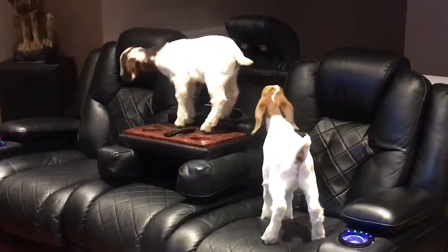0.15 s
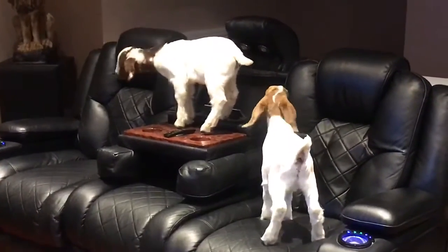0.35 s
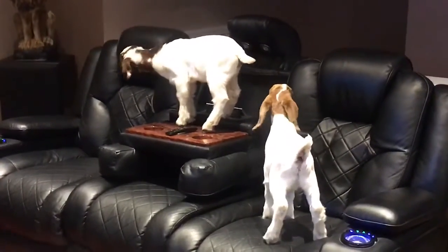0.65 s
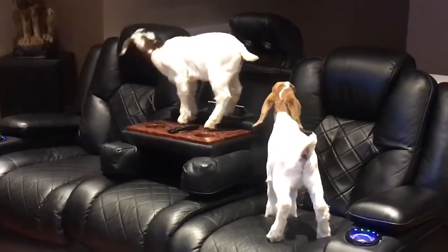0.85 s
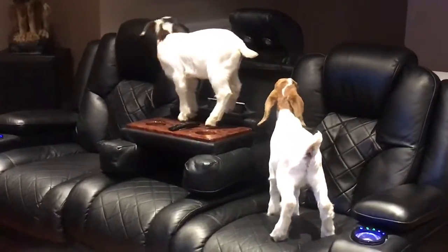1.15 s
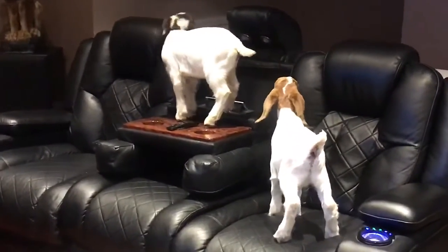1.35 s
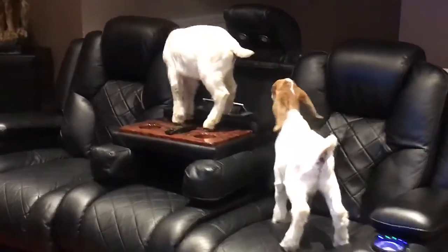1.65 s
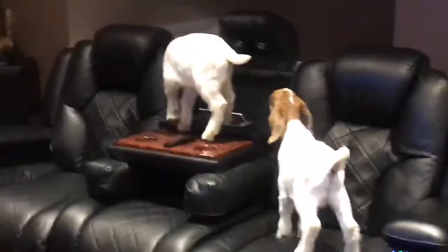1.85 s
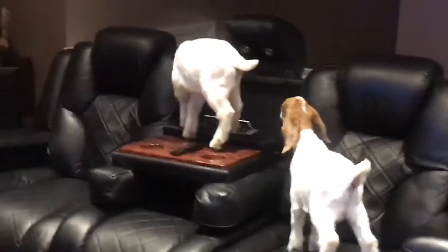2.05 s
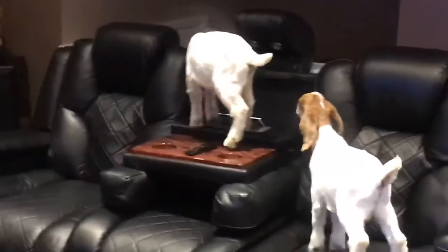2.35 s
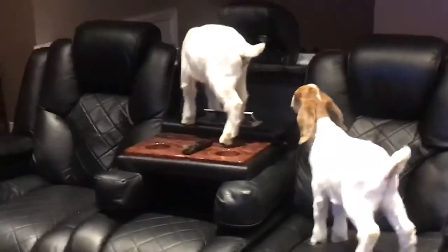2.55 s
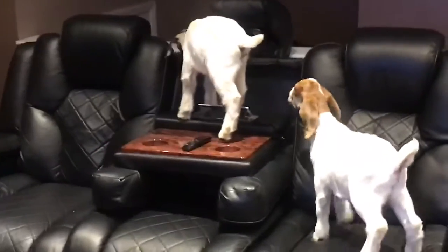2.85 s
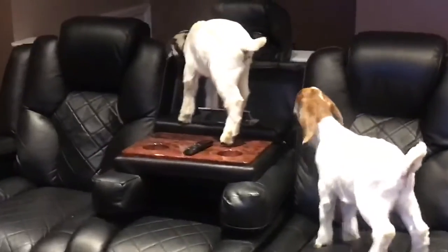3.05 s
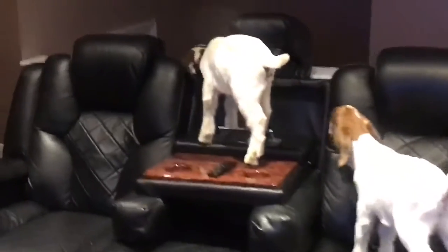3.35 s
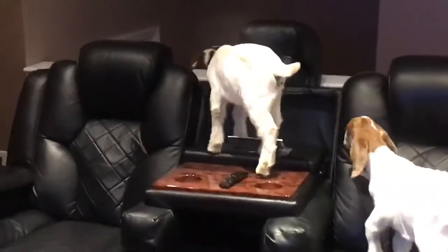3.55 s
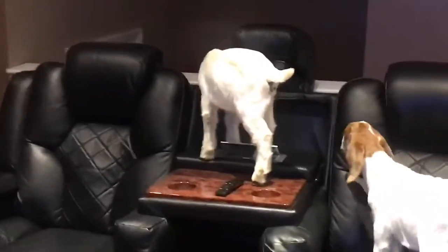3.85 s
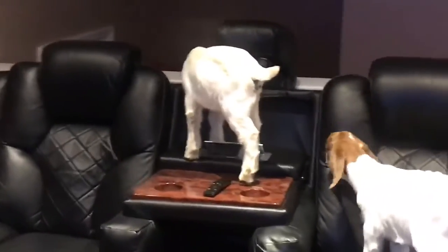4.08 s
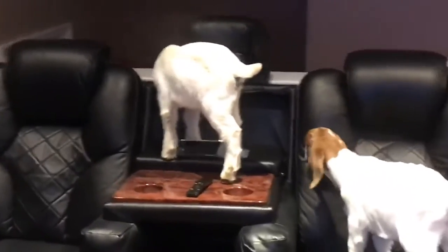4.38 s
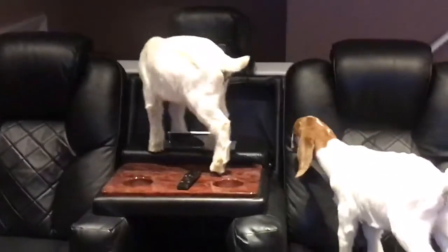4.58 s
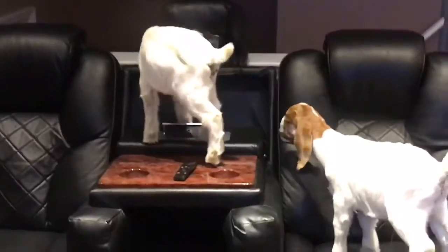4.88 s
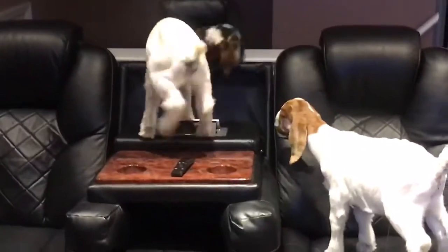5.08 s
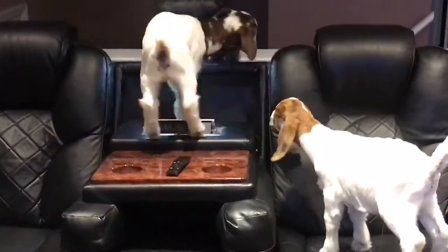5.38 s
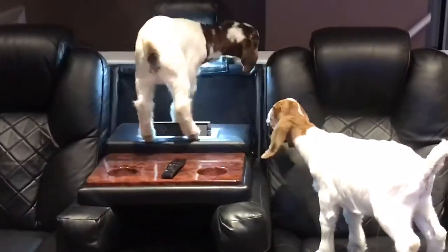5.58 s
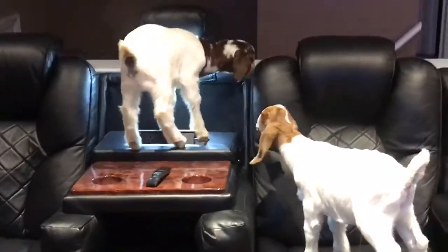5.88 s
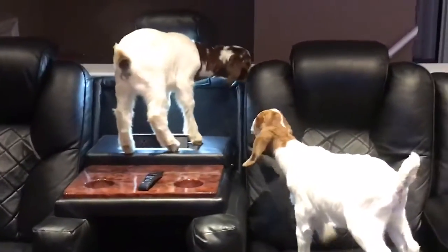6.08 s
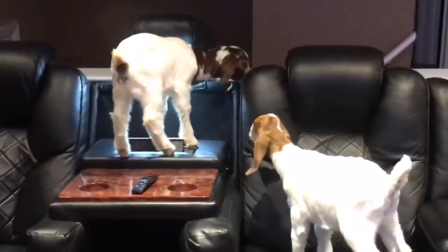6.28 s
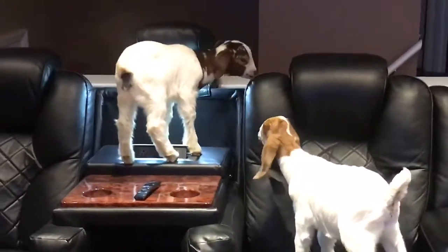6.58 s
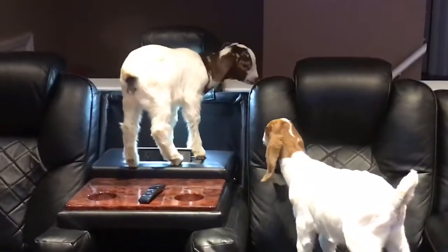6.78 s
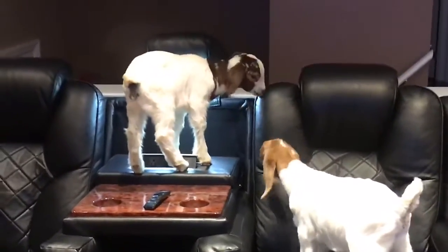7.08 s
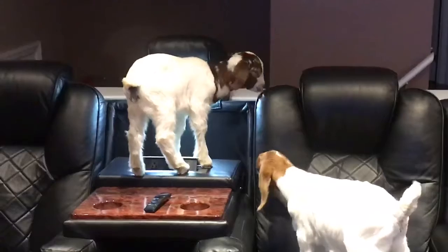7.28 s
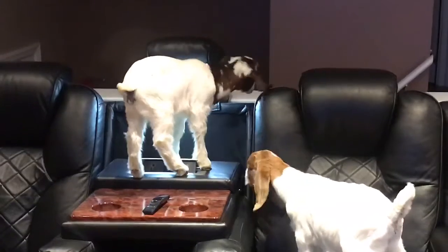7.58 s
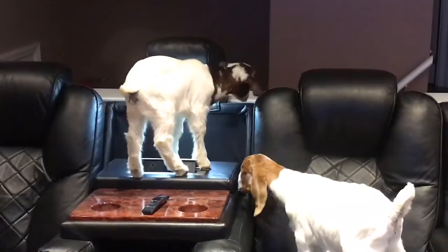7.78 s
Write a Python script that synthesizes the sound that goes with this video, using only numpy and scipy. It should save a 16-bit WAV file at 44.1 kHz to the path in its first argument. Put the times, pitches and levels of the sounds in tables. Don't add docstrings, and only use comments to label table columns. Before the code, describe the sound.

Close, dry hooves of two kid goats thud softly on leather cushions and click on a varnished wooden tray, rattling its loose lid and cup rims. The knocks grow heavy and crowded in the middle, then one kid facing away bleats long and quavering, blurred by the furnished room. Sparser steps and leather rustle follow, with faint microphone hiss.

```python
import sys
import numpy as np
from scipy import signal
from scipy.io import wavfile
from scipy.ndimage import uniform_filter1d

SR = 44100
rng = np.random.default_rng(int(sys.argv[2]) if len(sys.argv) > 2 else 0)


def boost_factor(decibels):
    exponent = np.asarray(decibels, float) / 20
    return 10 ** exponent


def to_wav(s):
    ch = np.atleast_2d(s).T
    pcm = np.round(np.clip(ch, -1, 1) * 32767)
    wavfile.write(sys.argv[1], SR, pcm.astype(np.int16))


N = 349713


def evened(x):
    return x / np.sqrt(np.mean(x ** 2) + 1e-20)


def peaked(x):
    return x / abs(x).max()


def read(points, hz):
    f, value = np.transpose(points)
    return np.interp(np.log(hz + 1), np.log(f + 1), value)


def add(mix, start_s, sound):
    part = mix[round(start_s * SR):][:len(sound)]
    part += sound[:len(part)]


def band(x, low_hz, high_hz):
    edges = [low_hz, min(high_hz, SR / 2.2)]
    return peaked(signal.sosfilt(signal.butter(3, edges, "bandpass", fs=SR, output="sos"), x))


def blunt(t, t60_s, rise_s):
    return boost_factor(-60 * t / t60_s) * (t / (t + rise_s)) ** 3


def wander(count, first, second):
    return evened(uniform_filter1d(uniform_filter1d(rng.standard_normal(count), size=first), size=second))


def noise(shape, patchy_db, flicker_db, size=512):
    frames, hz = N * 4 // size + 5, np.fft.rfftfreq(size, 1 / SR)
    a, b, patches = rng.standard_normal((frames, len(hz), 3)).T
    patches = evened(uniform_filter1d(uniform_filter1d(patches, size=8, axis=0), size=12, axis=1))
    flicker = evened(uniform_filter1d(np.minimum(rng.exponential(1, frames), np.e) - 1, size=2))
    level_db = read(shape, hz)[:, None] + patchy_db * patches + flicker_db * flicker
    z = (a + 1j * b) * boost_factor(level_db)
    return evened(signal.istft(z, nperseg=size, noverlap=size * 3 // 4)[1][:N])


# start_s, peak_db, body_hz, frame_boom_db, hard_edge_db
STAMPS = [(0.448, -33, 202, -37, -37), (0.658, -30, 297, -66, -39.5), (0.978, -38, 200, -36, -40),
          (1.166, -26, 167, -37, -32), (1.825, -38, 187, -35, -50), (1.964, -23, 350, -30, -35),
          (3.011, -25.5, 129, -32.5, -43), (3.072, -25.5, 345, -35.5, -24.5), (3.245, -40, 300, -47, -40),
          (3.386, -10.5, 382, -37.5, -20.5), (3.398, -23, 352, -32, -42), (3.422, -21.5, 350, -51, -39.5),
          (3.765, -19, 197, -32, -41.5), (3.824, -21.5, 187, -40, -40), (3.871, -21, 198, -41, -39.5),
          (4.031, -18, 166, -28, -30), (4.063, -20.5, 240, -31, -43), (4.473, -22.5, 188, -38.5, -31.5),
          (4.625, -19.5, 200, -36, -39), (4.666, -22, 171, -35, -43), (4.793, -26, 148, -59, -39.5),
          (5.466, -24, 176.7, -31, -46), (6.598, -30, 376, -35, -36), (6.821, -37, 306, -55, -44)]
# start_s, peak_db, body_hz, hard_edge_db
LIGHT_STEPS = [(0.611, -45, 136, -51.5), (1.308, -37, 183, -49.5), (1.531, -33.5, 176, -46.5),
               (1.61, -41, 135, -50), (2.613, -36, 132, -45), (2.987, -29, 186, -48),
               (3.029, -33, 120, -55), (3.157, -34, 187, -48), (3.328, -38, 177, -64),
               (3.362, -34, 200, -52), (3.936, -32.5, 160, -57), (3.976, -35, 167, -55),
               (4.45, -36, 143, -55), (5.117, -34.5, 165, -70), (5.813, -27, 132, -42),
               (5.93, -37, 135.7, -54), (6.252, -31, 137, -49), (6.273, -36, 132, -46.5),
               (6.289, -34, 155, -47.5), (6.627, -31, 134, -45), (6.772, -40.5, 158, -53),
               (6.886, -40.5, 151, -68), (7.283, -44.5, 153.6, -74), (7.453, -43, 130, -77),
               (7.54, -39, 100, -70), (7.69, -42.5, 100, -70.5), (7.1, -45, 119, -71),
               (3.44, -34, 140, -60),
               (2.389, -33.5, 216, -55), (2.413, -34, 345, -53), (2.438, -41, 353, -54),
              (2.635, -29.5, 227, -52), (2.747, -29.5, 259.8, -42), (3.562, -50, 386, -44.5),
              (3.957, -31.5, 317, -54), (4.094, -27, 206, -50), (4.589, -39.5, 402, -50),
              (4.77, -35.5, 414, -53), (5.79, -38, 330, -50), (5.999, -35.5, 422, -68),
              (6.226, -34, 251, -61), (7.5, -25, 240, -47.5), (7.484, -43, 249, -60),
              (3.836, -27.5, 230, -50), (3.885, -28.5, 240, -50), (.08, -43.5, 221, -61),
              (2.09, -41.5, 210, -58), (5.3, -38.5, 199, -62)]


def thuds():
    sag_hz, sag_s = 240, 0.0063
    light_boom_db = -13
    ring_s, ring_db, ring_halves_db = 0.04, -27.5, 25
    light = [(s, db, hz, db + light_boom_db, edge_db) for s, db, hz, edge_db in LIGHT_STEPS]
    steps = STAMPS + light
    out, t = np.zeros(N), np.arange(6000) / SR
    edge_turns = 390 * t + 2.1 * (1 - np.exp(-t / 0.0035))
    edge = peaked(blunt(t, 0.021, 0.0034) * np.sin(2 * np.pi * edge_turns))
    for (start_s, peak_db, hz, boom_db, edge_db), r in zip(steps, rng.random((len(steps), 5))):
        t60_s = ring_s * 2 ** ((ring_db - peak_db) / ring_halves_db)
        turns = 0.628 * hz * t + sag_hz * sag_s * (1 - np.exp(-t / sag_s))
        first = np.sin(2 * np.pi * (turns + 0.14 * r[0] + .05))
        other_hz = hz * (1.7 if hz < 260 else .55) * (0.885 + 0.35 * r[3])
        second = 0.61 * boost_factor(-.9 * other_hz * t) * np.sin(2 * np.pi * (other_hz * t + r[4]))
        body = blunt(t, max(t60_s, .01), 0.0032) * (first + second)
        boom = blunt(t, 0.07, 0.0085) * np.sin(2 * np.pi * ((45 + 28 * r[1]) * t + r[2]))
        add(out, start_s, boost_factor(peak_db) * peaked(body))
        add(out, start_s, boost_factor(boom_db + 7) * peaked(boom))
        add(out, start_s, boost_factor(edge_db + 2.5) * edge)
    return out


# start_s, peak_db, pitch_hz
PUSHES = [(0.798, -41, 140), (1.106, -39, 139), (1.167, -24, 146), (1.53, -37, 142), (1.824, -27, 161),
          (1.839, -35, 144), (1.868, -38, 91), (1.97, -25, 115), (2.416, -39, 151), (2.908, -40, 127),
          (2.973, -38, 143), (3.012, -29, 114), (3.043, -31, 129), (3.08, -24, 138), (3.103, -35, 141),
          (3.158, -35, 143), (3.244, -36, 144), (3.26, -38, 137), (3.326, -37, 137), (3.409, -27, 127),
          (3.423, -32, 130), (4.029, -23, 144), (4.066, -31, 157), (4.096, -32, 150), (4.111, -38, 149),
          (4.132, -38, 118), (4.173, -39, 100), (4.473, -27, 160), (4.491, -35, 107), (4.664, -29, 160),
          (5.117, -38, 159), (5.48, -36, 91), (5.984, -40, 125), (6.598, -31, 119), (6.63, -34, 119),
          (7.508, -34, 115)]
# start_s, peak_db, pitch_hz
LURCHES = [
    (0.762, -43, 54),
    (0.998, -32, 54),
    (1.136, -41, 53),
    (1.233, -39, 52),
    (1.276, -41, 56),
    (1.548, -40, 49),
    (2.985, -33, 52),
    (3.77, -31, 53),
    (3.874, -38, 53),
    (6.311, -42, 57),
]
# start_s, peak_db, pitch_hz
BUMPS = [(.446, -33, 443), (.757, -42, 130), (.833, -44, 125), (.86, -45, 120), (.93, -39, 110),
         (.979, -18.5, 200), (1.824, -25, 170), (1.97, -29, 110), (3.08, -28, 105), (4.034, -22, 160),
         (7.506, -31, 100), (.659, -32, 400), (4.794, -30, 270), (2.612, -38, 270), (3.769, -30, 400),
         (1.046, -37, 160), (7.165, -44, 160), (.19, -41, 52), (1.4, -42, 250), (6.598, -35, 105),
         (3.02, -37, 600), (3.252, -30, 280), (6.821, -36, 180), (1.146, -45, 327), (1.634, -45, 507),
         (1.659, -45, 331), (1.985, -43, 393), (3.012, -35, 396), (3.044, -37, 421), (3.399, -26, 357),
         (4.452, -43, 356), (5.467, -21, 390), (5.767, -44, 335), (6.223, -41, 348), (6.25, -37, 364),
         (6.823, -28, 310), (3.2475, -23.5, 600)]


def pushes():
    out, turns = np.zeros(N), 1.8
    for start_s, peak_db, hz in PUSHES + LURCHES + BUMPS:
        u = np.arange(0, 1, hz / turns / SR)
        swell = np.sin(np.pi * u ** .8) ** 2
        add(out, start_s, boost_factor(peak_db) * swell * np.sin(2 * np.pi * turns * u ** .85))
    return out


# start_s, peak_db, centre_hz, top_edge_db
TIPS = [(0.241, -48.5, 3220, -59), (0.4496, -27, 1640, -52), (0.5218, -36, 4100, -66),
        (0.642, -41, 3000, -72), (0.678, -33.5, 4100, -62), (0.736, -46.5, 1800, -71),
        (1.168, -34, 1700, -62), (1.315, -45, 1680, -65), (1.5333, -46.5, 1700, -68),
        (1.6995, -49, 1510, -68), (1.7557, -47, 1810, -67), (1.809, -55.5, 2970, -62),
        (1.8424, -36.5, 3010, -54), (1.9872, -40, 1590, -52), (2.1877, -43.5, 2320, -73),
        (2.3077, -49.5, 2040, -70), (2.363, -46.5, 2920, -60), (2.56, -55, 3030, -68),
        (3.0746, -19.5, 2900, -65), (3.386, -33, 1900, -64), (3.424, -42.5, 2430, -67),
        (3.5643, -42, 1710, -54), (6.5992, -26.5, 1680, -54), (6.675, -38, 3670, -54),
        (6.8206, -38.5, 3930, -69), (6.842, -38, 3800, -52), (7.1596, -47, 3340, -54)]
# start_s, peak_db, top_edge_db
SNAPS = [(2.9819, -35.5, -52), (2.9892, -50, -58), (3.0102, -43.5, -55), (3.025, -50, -55),
         (3.0354, -44, -60), (3.048, -43.5, -59), (3.081, -27.5, -37), (3.1133, -62, -45),
         (3.1256, -48.5, -46), (3.137, -46.5, -43), (3.1587, -50.5, -50), (3.2117, -45, -44),
         (3.226, -40.5, -43), (3.2357, -42, -44), (3.248, -25, -30)]


def clicks():
    out, t = np.zeros(N), np.arange(2000) / SR
    snap_hz = 1900
    for start_s, peak_db, hz, top_db in TIPS + [(s, db, snap_hz, top) for s, db, top in SNAPS]:
        burst = rng.standard_normal(len(t)) * boost_factor(-60 * t / 0.0068) * t / (t + 0.00022)
        top = band(burst, 4500, 7000) + boost_factor(-22.0) * band(burst, 11300, 15500)
        add(out, start_s, boost_factor(peak_db) * band(burst, hz / 2.16, hz * 1.19) + boost_factor(top_db) * top)
    return out


# start_s, peak_db, pitch_hz
LID_CHATTER = [(0.436, -36.5, 374), (1.079, -47, 334), (1.11, -41, 396), (1.311, -37, 374),
               (1.574, -48, 347), (1.785, -43, 398), (1.967, -24.5, 376), (2.685, -46, 412),
               (3.156, -44, 301), (3.916, -48, 300), (3.958, -32, 328), (3.979, -35, 318),
               (4.032, -16.5, 390), (4.796, -27.5, 333), (4.832, -40.5, 425), (5.36, -55, 439),
               (6.581, -48, 401), (6.632, -29, 347), (7.461, -49, 350), (7.501, -28.5, 303),
               (7.524, -41, 301), (7.539, -42, 301), (7.555, -46, 301), (7.57, -42, 300), (7.582, -52, 382),
               (7.599, -46, 301), (7.616, -42.5, 326), (7.641, -49, 350), (7.677, -64, 388),
               (7.772, -50, 385), (7.851, -57, 358), (7.911, -51.5, 386)]
# start_s, peak_db, pitch_hz
CUP_RIMS = [(0.449, -30.5, 867), (0.523, -46, 2100), (0.642, -49, 950), (0.657, -33.5, 950),
            (0.679, -44, 1950), (0.98, -42, 900), (1.841, -40, 837), (3.247, -30, 950), (1.168, -44, 3500),
            (1.172, -43, 2900), (1.964, -51, 3100), (6.821, -39, 900), (6.83, -49, 930), (7.16, -52, 1050),
            (1.168, -29, 854), (3.074, -20.5, 818), (3.386, -27.5, 810), (3.564, -47, 939),
            (4.475, -35, 1090), (6.29, -53, 888), (6.599, -32, 918)]


def rings():
    out, t = np.zeros(N), np.arange(3000) / SR
    for table, t60_s, gain_db, sag in ((LID_CHATTER, .017, .5, .4), (CUP_RIMS, .013, -3.5, .25)):
        for start_s, peak_db, hz in table:
            turns = (1 - sag) * hz * t + 2 * sag * hz * 0.0061 * (1 - np.exp(-t / 0.0059))
            ring = blunt(t, t60_s, .0022) * np.sin(2 * np.pi * turns)
            add(out, start_s, boost_factor(peak_db + gain_db) * peaked(ring))
    return out


# start_s, length_s, dull_db, bright_db
SCRAPES = [(.655, 0.018, -54, -50), (1.167, 0.0084, -40.5, -47), (1.634, 0.21, -51.5, -81),
           (2.2, 0.022, -49.5, -70), (1.819, 0.046, -44.5, -54.5), (1.7, 0.089, -56, -59.5),
           (2.582, 0.075, -52, -47.5), (2.978, 0.12, -47, -53.5), (3.24, 0.013, -47, -49),
           (3.071, 0.011, -30, -37.5), (.449, 0.0047, -41, -52.5), (6.598, 0.0092, -51, -59),
           (5.5, 0.04, -60, -75), (4.104, 0.045, -50.5, -62), (6.82, 0.015, -57, -54),
           (7.2, 0.018, -64, -77), (7.165, 0.021, -55, -71), (3.535, 0.063, -53, -76)]


def scrapes():
    out, n = np.zeros(N), round(.2 * SR)
    t = np.arange(n) / SR
    slips_per_s, puff_s = 250, 0.0013
    for start_s, length_s, dull_db, bright_db in SCRAPES:
        slips = boost_factor(2.0 * rng.exponential(1, n)) * (rng.random(n) < slips_per_s / SR)
        grain = signal.lfilter([1], [1, -np.exp(-1 / (puff_s * SR))], slips) + .5
        drag = grain * rng.standard_normal(n) * np.clip(t / 0.00097, 0, 1) * np.exp(-(t / length_s) ** 3)
        dull = band(drag, 330, 1550)
        bright = band(drag, 2700, 3700) + boost_factor(-14) * band(drag, 5260, 7070)
        add(out, start_s, boost_factor(dull_db + 7.5) * dull + boost_factor(bright_db + 10.5) * bright)
    return out


# time_s, effort_db, resting_pitch_hz, brightness_db_per_octave (mouth opening)
BLEAT = [
    (4.89, -28, 444.4, -5.5),
    (4.949, -39, 440.5, 3),
    (5.13, -34, 443, 2.5),
    (5.249, -36, 440.4, 3),
    (5.55, -42, 433.2, -0.5),
    (5.8, -45.5, 422.5, -2.5),
    (6.031, -42.5, 443.7, 1),
    (6.075, -49, 440, 1),
    (6.15, -60, 430, .3),
]
# time_s, lift_share of pitch, push_db of air just after
QUAVER = [(4.948, 0.077, 3.2), (5.028, 0.08, 4.5), (5.099, 0.071, 4), (5.191, 0.068, 3.5),
          (5.268, 0.055, 3), (5.354, 0.068, 0), (5.438, 0.047, 2.5), (5.53, 0.043, -0.6),
          (5.617, 0.052, 0.7), (5.688, 0.06, -0.7), (5.78, 0.065, -2.5), (5.864, 0.065, 0),
          (5.956, 0.071, 0.5), (6.025, 0.047, 0.8)]
# freq_hz, level_db
THROAT = [(440, -18.5), (890, -3), (1380, -9.5), (1780, -6), (2020, -2), (2400, -10.5), (2680, -9),
          (3110, 7), (3550, -12), (4800, -14.5), (5700, -8), (6200, -14), (6700, -26), (7400, -18.5),
          (10500, -55)]
# time_s, resonance_hz
JAW = [
    (4.89, 820),
    (4.925, 820),
    (4.96, 1150),
    (5.1, 1000),
    (5.25, 1200),
    (5.45, 1000),
    (5.9, 1030),
    (6.05, 1150),
    (6.09, 1500),
]
# time_s, unevenness_share
PAIRING = [
    (4.89, 0),
    (4.92, .18),
    (5.02, .14),
    (5.08, .03),
    (6.04, .02),
    (6.07, .5),
    (6.13, .35),
]


def bleat():
    attack_s, attack_db, scoop = .028, -32, 0.075
    whimper_s, whimper_db_per_s = .11, -40
    mouth_rest, mouth_per_db = 1.047, -.017
    closing = .045
    jerk_s, push_lag_s, push_s = .044, 0.036, 0.022
    jaw_db, jaw_width_hz, breath_db = 11, 450, -26

    s, *columns = np.transpose(BLEAT)
    t = np.arange(s[0] - attack_s, s[-1] + whimper_s, 1 / SR)
    effort_db, hz, tilt_db = (np.interp(t, s, c) for c in columns)
    early = np.clip((s[0] - t) / attack_s, 0, 1)
    effort_db = effort_db + attack_db * early + whimper_db_per_s * np.maximum(t - s[-1], 0)
    mouth = mouth_rest + mouth_per_db * tilt_db * (t > s[1]) + closing * (t > s[-3] - .1)

    jerk, lifts = np.zeros(len(t)), np.zeros(len(t))
    for at, lift, push_db in QUAVER:
        pulse = np.exp(-abs((t - at) / (jerk_s / 2)) ** 3)
        jerk += pulse
        lifts += lift * pulse
        effort_db += push_db * np.exp(-((t - at - push_lag_s) / push_s) ** 2)
    jitter = (.004 + .018 * (t > 6.06)) * wander(len(t), 500, 500)
    hz = hz * (1 - scoop * early) * (1 + lifts + jitter)
    turns = np.cumsum(hz) / SR

    k = np.arange(1, 24)[:, None]
    shift = np.where((k > 4) & (k < 10), mouth, 1)
    line_db = read(THROAT, k * hz / shift) + np.log2(np.maximum(k, 2) / 2) * tilt_db
    line_db -= jerk * (.8 + 0.034 * k ** 2)
    jaw_hz = np.interp(t, *np.transpose(JAW))
    lines = boost_factor(line_db + jaw_db * np.exp(-((k * hz - jaw_hz) / jaw_width_hz) ** 2))
    flicker = evened(uniform_filter1d(rng.standard_normal((len(t) // 200 + 1, len(k))), size=3, axis=0))
    flicker_db = np.minimum(1.2 + .4 * k.T, 3.5) * flicker
    lines *= boost_factor(flicker_db).repeat(200, axis=0)[:len(t)].T
    lines = uniform_filter1d(lines, size=200)
    voice = (lines * np.cos(2 * np.pi * k * turns + .3 * k ** 2)).sum(0)

    air = signal.lfilter(*signal.butter(2, 150, fs=SR), rng.standard_normal((2, len(t))))
    air = np.sqrt(2) * boost_factor(breath_db) * evened(air)
    gap = 2 * np.pi * (k[4:] - .5) * turns
    voice += (lines[4:] * (air[0] * np.cos(gap) + air[1] * np.sin(gap))).sum(0)
    voice /= np.sqrt(uniform_filter1d(voice ** 2, size=8000))

    uneven = np.interp(t, *np.transpose(PAIRING))
    pairs = 1 + uneven * np.cos(np.pi * turns)
    hoarse = 1 + (.07 + .7 * uneven * (t > 6)) * wander(len(t), 50, 40)
    out = np.zeros(N)
    add(out, t[0], boost_factor(effort_db) * voice * pairs * hoarse)
    return out


# freq_hz, t60_s
ROOM = [(200, .25), (900, .38), (3000, .32), (8000, .2)]


def room(x):
    taps = np.zeros(SR // 2)
    at = np.arange(300, SR // 2 - 20, 20)
    taps[at + rng.integers(0, 20, len(at))] = rng.choice([-1., 1.], len(at))
    hz, t, z = signal.stft(taps, SR, nperseg=256)
    tail = signal.istft(z * boost_factor(-60 * t / read(ROOM, hz)[:, None]), SR, nperseg=256)[1]
    return signal.fftconvolve(x, tail / np.linalg.norm(tail))[:N]


# time_s, stir_db
STIR = [(0, -60), (.5, -52.5), (.72, -57), (.93, -44.5), (1.45, -46), (2.2, -54.5), (2.7, -49), (2.88, -55),
        (3.06, -38), (3.42, -46.5), (3.6, -61), (4, -44.5), (4.35, -54), (5.55, -55), (5.78, -48.5),
        (6.5, -53.5), (7.02, -68), (7.56, -54)]
# time_s, rub_db
RUBS = [(0, -72.5), (.3, -69.5), (.75, -68), (1.35, -66), (1.67, -69.5), (2.14, -65), (2.62, -66),
        (2.86, -65), (3.09, -60.5), (3.33, -63.5), (3.57, -65), (3.81, -68.5), (4.1, -66.5), (4.76, -65),
        (6.36, -64), (6.7, -67), (7.2, -65), (7.92, -69.5)]
# freq_hz, level_db
RUMBLE = [(12, -44.5), (24, -20.5), (42, 0), (60, -3), (130, -5.5), (170, -29), (290, -120)]
# freq_hz, level_db
CUSHION = [(53, -22.5), (90, -0.5), (214, -5), (371, -8), (555, -27.5), (700, -47), (910, -38),
           (1540, -120)]
# freq_hz, level_db
SCUFF = [(290, -31), (500, -2), (802, -5.5), (1760, -6.5), (2400, -12), (3120, -51), (5280, -120)]
# freq_hz, level_db
RUSTLE = [(1180, -37), (2000, -7.5), (2950, 0), (3370, 4), (4800, -15), (5300, -8.5), (6130, -7),
          (6740, -16), (7360, -11.5), (9000, -48.5), (11700, -64.5), (19800, -120)]


def sofa():
    t = np.arange(N) / SR
    stir_db = np.interp(t, *np.transpose(STIR)) + 52
    stir_db -= 26 * np.maximum(t - STIR[-1][0], 0)
    rub_db = np.interp(t, *np.transpose(RUBS))
    rumble = boost_factor(-50.5 + 0.96 * stir_db) * noise(RUMBLE, 3.0, 0.46, size=2048)
    creak = boost_factor(-52.5 + 0.9 * stir_db - 2.0) * noise(CUSHION, 3.26, 3.8, size=512)
    scuff = boost_factor(rub_db + 2 - .5 * t) * noise(SCUFF, 1.9, 2.64, size=256)
    rustle = boost_factor(rub_db - 1.5 + 0.4249 * t) * noise(RUSTLE, 1.5, 1.4, size=256)
    return rumble + creak + scuff + rustle


def lens():
    steps_per_s = 60
    steps = np.zeros(N)
    at = np.arange(.483 % (1 / steps_per_s), N / SR - .1, 1 / steps_per_s)
    steps[(at * SR).astype(int)] = rng.random(len(at)) ** 2
    t = np.arange(400) / SR
    modes = sum(gain * np.sin(2 * np.pi * hz * t) for hz, gain in ((1600, 1), (7200, .7), (6200, .4)))
    return boost_factor(-59) * signal.oaconvolve(steps, boost_factor(-60 * t / .006) * modes)[:N]


def scene():
    voice = bleat()
    soft = thuds() + rings() + pushes()
    hard = clicks() + scrapes()
    wet = room(boost_factor(-2.5) * voice + boost_factor(-26.0) * soft + boost_factor(-22.5) * hard)
    return (boost_factor(-4.0) * voice + soft + hard + wet + sofa() + lens())[None]


# freq_hz, level_db
HISS = [(4410, -31), (7500, -14.5), (8170, -4.5), (10300, -10), (11800, -6), (15100, -7.5), (15600, -9)]
# on_s, off_s
LOW_GAIN = [
    (4.034, 4.441),
]
# freq_hz, level_db
STAGE_HISS = [(2350, -30), (4000, -1), (7530, -4), (12400, -5.5), (15600, -6)]


def microphone_hiss():
    t = np.arange(N) / SR
    stage = sum((t > on_s) & (t < off_s) for on_s, off_s in LOW_GAIN)
    return boost_factor(-79) * noise(HISS, .3, .3) + boost_factor(-66) * stage * noise(STAGE_HISS, .3, .3)


def top_cut(x):
    return signal.sosfilt(signal.butter(12, 16370, fs=SR, output="sos"), x)


def record(dry):
    port = signal.butter(2, 30, "highpass", fs=SR, output="sos")
    heard = signal.sosfilt(port, dry + microphone_hiss())
    edge = signal.firwin(511, 15800, window=("kaiser", 9), fs=SR)[None]
    return top_cut(signal.oaconvolve(heard, edge, "same"))


dry = scene()
out = record(dry)
to_wav(out)
```